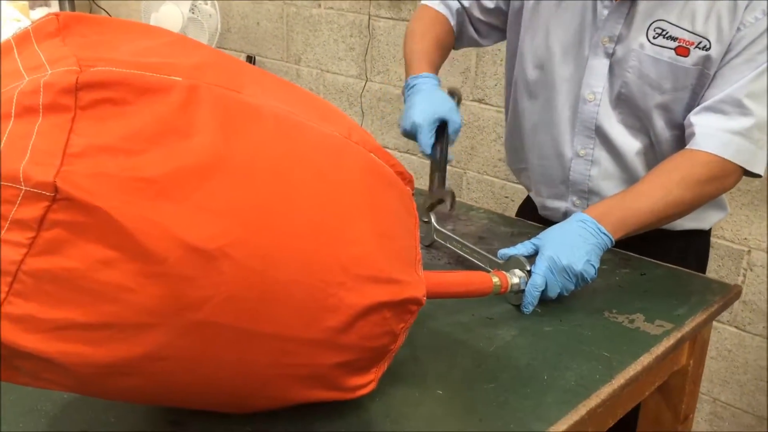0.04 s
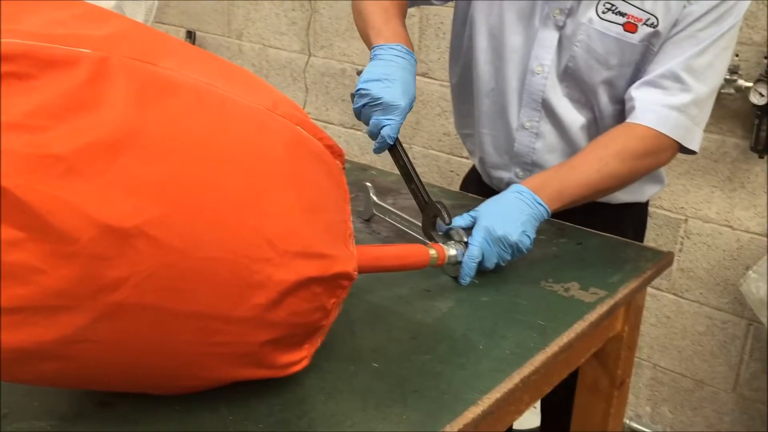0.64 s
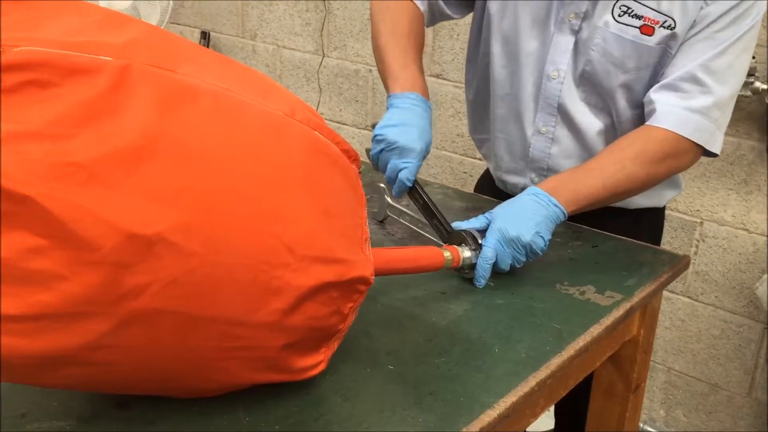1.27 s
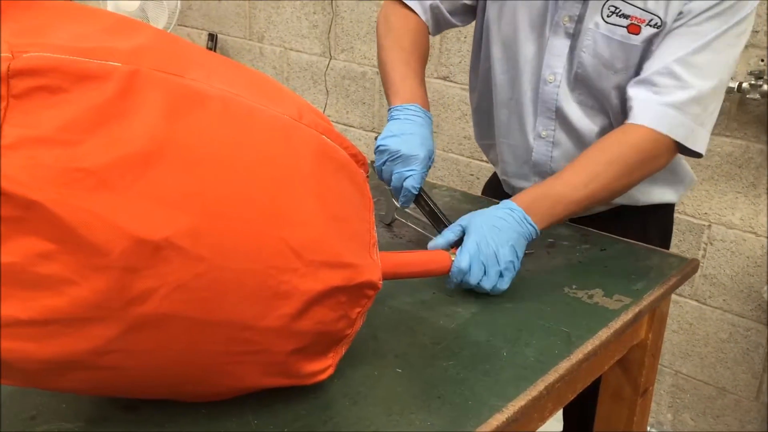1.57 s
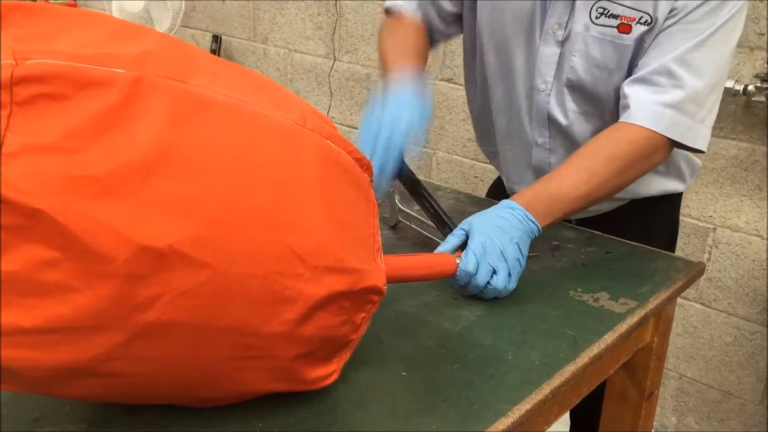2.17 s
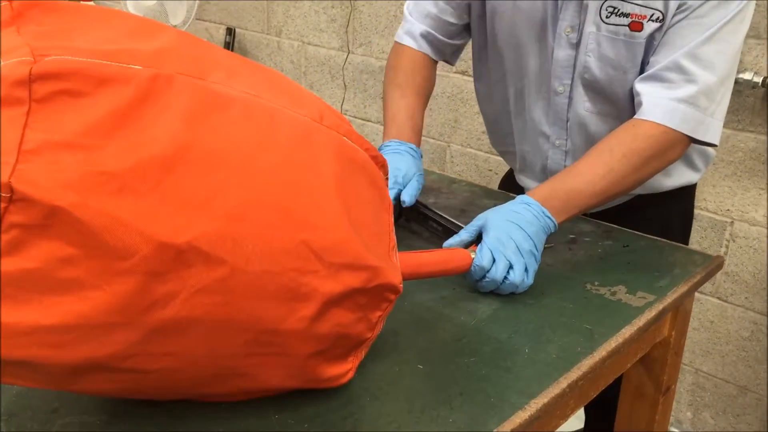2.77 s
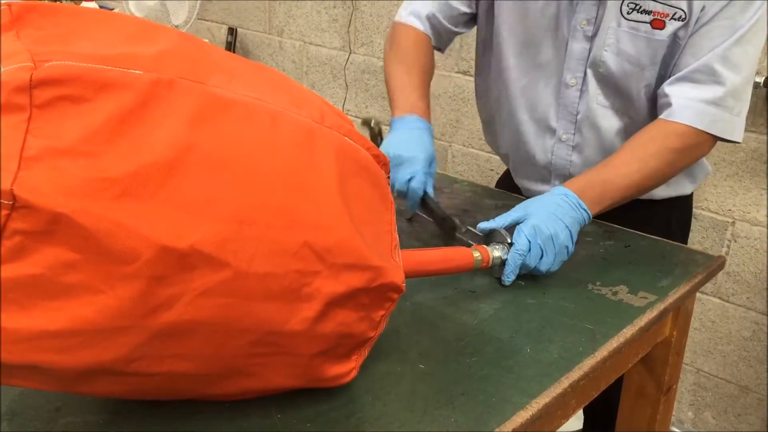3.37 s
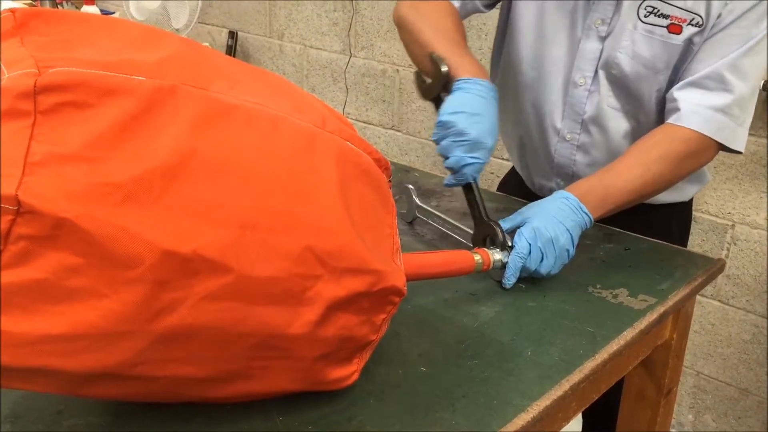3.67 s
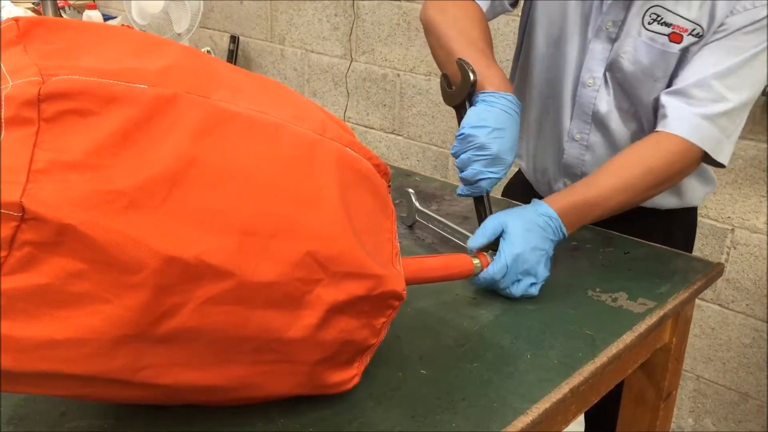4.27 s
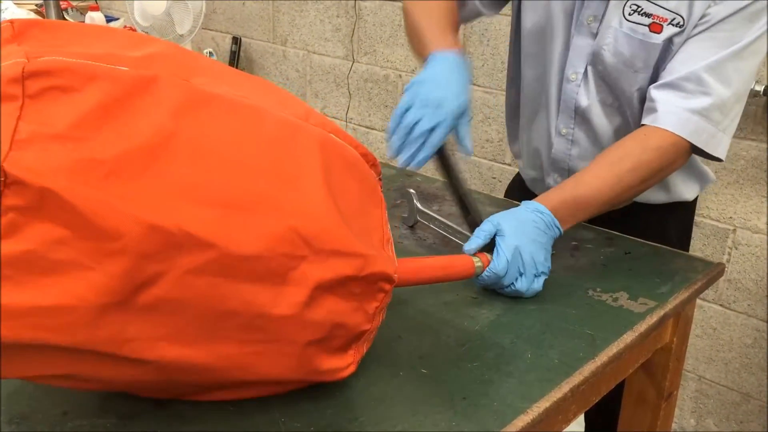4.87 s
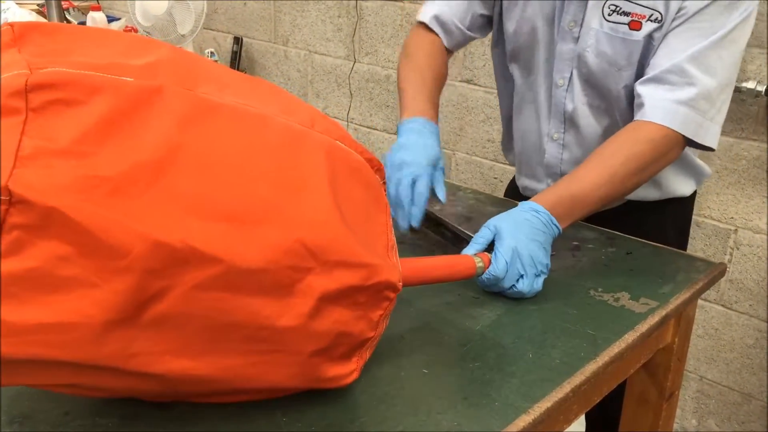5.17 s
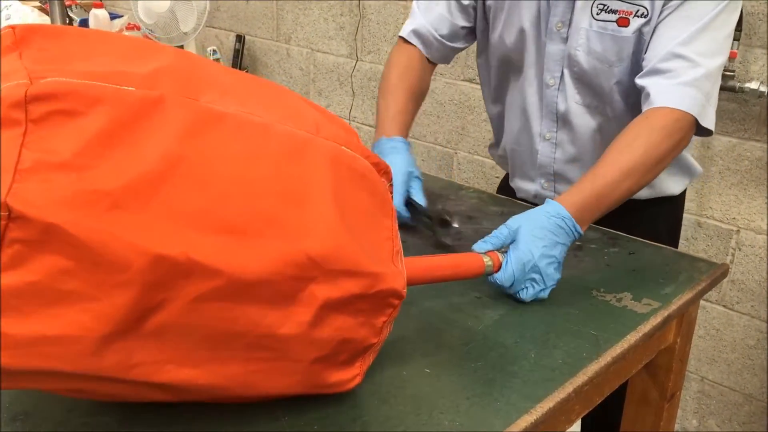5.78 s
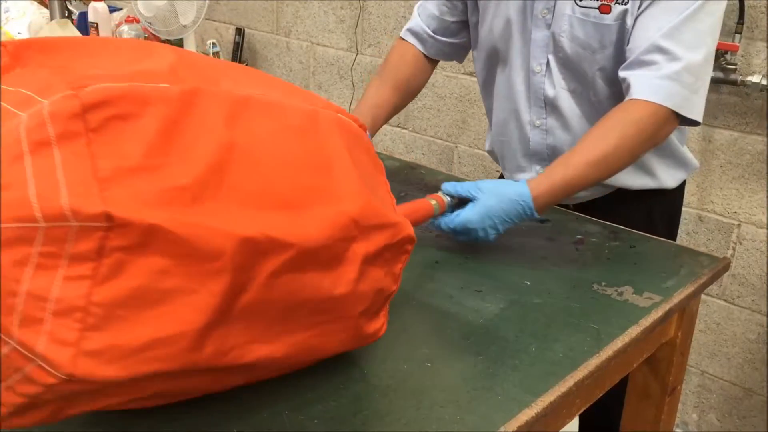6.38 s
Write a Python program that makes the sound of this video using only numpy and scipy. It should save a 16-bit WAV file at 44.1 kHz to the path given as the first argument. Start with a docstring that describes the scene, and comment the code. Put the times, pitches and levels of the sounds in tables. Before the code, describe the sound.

A steel spanner clicks on a fitting and bangs on a bench over a steady, whistling air leak, ending with clinks and rustling fabric.

```python
"""A reverberant workshop. Air leaks from the hose fitting of a large fabric bag on the bench: a thin hiss
with a breathy whistle, brighter when a gloved hand cups it. A long steel spanner clicks on the nut,
knocks and drops on the bench, and rings; the bag rumbles and crinkles as it is dragged across the top.
One microphone, which overloads on the hardest blow."""
import sys
import numpy as np
from scipy import signal
from scipy.fft import rfft, irfft
from scipy.io import wavfile
from scipy.ndimage import map_coordinates

SR = 44100
rng = np.random.default_rng(int(sys.argv[2]) if len(sys.argv) > 2 else 0)


def master(y):
    """Save y as 16-bit WAV."""
    cut = np.clip(np.atleast_2d(y).T, -1, 1)
    pcm = np.round(cut * 32767)  # scale
    wavfile.write(sys.argv[1], SR, pcm.astype(np.int16))


N = 292383
TIME = np.arange(N) / SR
BANDS_HZ = 40 * 2 ** (np.arange(18) / 2)


def undb(db):
    """Decibels to gain."""
    return 10 ** (np.asarray(db) / 20)


def unit(x):
    """Scale to rms 1."""
    return x / np.sqrt(np.mean(x ** 2))


def at_pitch(rows, hz):
    """A spectrum's columns, interpolated over log frequency."""
    row_hz, *columns = np.transpose(rows)
    return [np.interp(np.log(hz), np.log(row_hz), column) for column in columns]


def noise(hz, width_hz, order, count=N):
    """Band-passed white noise."""
    edges_hz = np.clip([hz - width_hz / 2, hz + width_hz / 2], 10, .49 * SR)
    bandpass = signal.butter(order, edges_hz, "band", fs=SR, output="sos")
    return signal.sosfilt(bandpass, rng.standard_normal(count))


def half_octave(hz, count=N):
    """Half an octave of noise, rms 1."""
    return unit(noise(hz, hz * np.log(2) / 2, order=3, count=count))


def walk(rate_hz, count=N):
    """Smooth random curve, spread near 1."""
    knots = rng.standard_normal(1024)
    return np.interp(TIME[:count] * rate_hz, np.arange(len(knots)), knots)


def ramp(start_s, length_s):
    """Linear rise from 0 to 1."""
    return np.clip((TIME - start_s) / max(length_s, 1 / SR), 0, 1)


def fade(t60, count=SR):
    """Exponential decay, 60 dB in t60 seconds."""
    return np.exp(-np.log(1000) * TIME[:count] / max(t60, 1 / SR))


def ring(hz, t60):
    """One decaying mode, slightly detuned at random, in a 1 s buffer."""
    out = np.zeros(SR)
    count = int(np.clip(t60 * SR, 1, SR))
    detuned_hz = hz + 1.5 * rng.standard_normal()
    out[:count] = np.sin(2 * np.pi * detuned_hz * TIME[:count]) * fade(t60, count)
    return out


def add(track, start_s, sound):
    """Mix a sound into a track."""
    i = int(np.clip(start_s * SR, 0, N - 1))
    track[i:i + len(sound)] += sound[:N - i]


# hand over the fitting: close t/s, closing time/s, open t/s, opening time/s
HAND_CUPS = [(1.52, 0.11, 3, 0.19), (4.08, 0.37, 4.5, 1.9)]
# gap resonances: f/Hz, width/Hz, open level/dB, cupped level/dB
GAP_MODES = [(3544, 300, -56, -54.5), (3950, 280, -68, -73), (5730, 140, -69.5, -72), (6140, 380, -65, -80),
             (6470, 73, -64, -69.5), (7230, 380, -60, -77), (7280, 190, -67, -63),
             (10790, 550, -65.5, -55.5), (14100, 600, -65, -56.5)]
# jet hiss per half octave: f/Hz, open level/dB, cupped level/dB
JET_SPECTRUM = [(700, -73, -76), (1400, -69.5, -67), (2630, -65.5, -65.5), (4000, -61.5, -60.5),
                (5110, -66.5, -67), (7070, -64, -63.5), (10200, -65.5, -58.5), (14470, -67, -55.5)]


def leak(flow_db=-1, sag_db_per_s=-.25, muffle_db=-2, flutter_db=1.3, wander=0.0035):
    """The jet hisses and excites the gap, fading as pressure falls; cupping favours the top treble."""
    cupped = sum(ramp(close_s, closing_s) * (1 - ramp(open_s, opening_s))
                 for close_s, closing_s, open_s, opening_s in HAND_CUPS)
    whistle = np.zeros(N)
    for hz, width_hz, open_db, cupped_db in GAP_MODES:
        tone = unit(noise(hz, width_hz, order=2) + 0.18 * noise(hz, width_hz, order=1))
        whistle += tone * undb(open_db + cupped * (cupped_db - open_db) + flutter_db * walk(22.43))
    # pitch wanders with jet speed
    read_at = np.arange(N) + np.cumsum(wander * walk(2.1))
    whistle = map_coordinates(whistle, [read_at], order=3, mode="mirror")
    hiss = np.zeros(N)
    for hz in BANDS_HZ[BANDS_HZ > 600]:
        open_db, cupped_db = at_pitch(JET_SPECTRUM, hz)
        hiss += half_octave(hz) * undb(open_db + cupped * (cupped_db - open_db) + .7 * walk(29))
    return (whistle + hiss) * undb(flow_db + sag_db_per_s * TIME + muffle_db * cupped)


def near_walls(x, share=0.36, reach_s=.012, copies=12):
    """Bench top and back wall return early copies that ripple the spectrum."""
    taps = np.zeros(SR // 20)
    lags = (rng.uniform(0.0011, reach_s, size=copies) * SR).astype(int)
    taps[lags] = share * rng.choice([-1, 1], size=copies) / np.sqrt(copies)
    taps[0] = 1
    return signal.fftconvolve(x, taps / np.sqrt(np.sum(taps ** 2)))[:N]


# background per half octave: f/Hz, level/dB
AIR_SPECTRUM = [(28, -72), (56, -61), (110, -67.5), (170, -60.5), (300, -100), (600, -77.5), (1200, -88),
                (3000, -86.5)]


def workshop_air():
    """Low, gently stirring background noise."""
    return sum(half_octave(hz) * undb(at_pitch(AIR_SPECTRUM, hz)[0] + 1.1 * walk(24))
               for hz in BANDS_HZ[BANDS_HZ < 3000])


# bag and hose shoved over the bench: t/s, length/s, rumble level/dB, crinkle level/dB
BAG_SHOVES = [(0, .42, -68.5, -62), (1.032, 0.12, -49.5, -70), (1.196, 0.064, -34.5, -49),
              (1.435, .06, -41, -68), (3.32, 0.072, -42.5, -47.5), (3.791, 0.097, -36, -51.5),
              (3.955, 0.16, -39, -74), (4.495, 0.43, -72.5, -67), (5.02, 0.12, -42.5, -63),
              (5.248, 0.39, -56, -45), (5.668, 0.22, -37, -49), (5.917, 0.086, -34.5, -43),
              (6.011, 0.15, -35.5, -39), (6.219, 0.088, -32, -25.5), (6.411, 0.077, -44, -38.5)]


def shoving(attack_s=0.035, release_s=0.041, floor_rumble_db=-65.5, floor_crinkle_db=-73):
    """Gains: each shove speeds up, slides, dies away to a faint, steady background rumble and crackle."""
    rumble, crinkle = np.full(N, undb(floor_rumble_db)), np.full(N, undb(floor_crinkle_db))
    for start_s, length_s, rumble_db, crinkle_db in BAG_SHOVES:
        release = np.exp(-np.maximum(TIME - start_s - length_s, 0) / release_s)
        speed = ramp(start_s, attack_s) * release
        rumble += undb(rumble_db) * speed
        crinkle += undb(crinkle_db) * speed
    return rumble, crinkle


# cloth spectra per half octave: f/Hz, relative level/dB
RUMBLE_SPECTRUM = [(40, -76), (90, -9), (160, 8.5), (290, 4), (450, -5), (900, -6), (2000, -66)]
CRINKLE_SPECTRUM = [(300, -15.5), (700, -1), (1400, 2.5), (2500, 0), (4500, -9.5), (9000, -20),
                    (15000, -18.5)]


def bag(snaps_per_s=7000, grain_db=4, catch_db=-0.5):
    """The taut fabric rumbles as it catches and slips; its folds crinkle in tiny snaps."""
    rumble_gain, crinkle_gain = shoving()
    snaps = (rng.random(N) < snaps_per_s / SR) * rng.standard_normal(N)
    snaps *= undb(grain_db * np.minimum(rng.exponential(size=N), 4))
    bins_hz = np.maximum(np.fft.rfftfreq(N, 1 / SR), 1)
    colour = undb(at_pitch(CRINKLE_SPECTRUM, bins_hz)[0]) / np.sqrt(np.maximum(bins_hz, 300))
    crinkle = unit(irfft(rfft(snaps) * colour, N))
    rumble = unit(sum(half_octave(hz) * undb(at_pitch(RUMBLE_SPECTRUM, hz)[0])
                      for hz in BANDS_HZ[BANDS_HZ < 2000]))
    return (rumble * rumble_gain + crinkle * crinkle_gain) * undb(catch_db * walk(38))


# dense ringing of the bench top: f/Hz, level/dB, t60/s
TOP_RINGING = [(40, -10.5, 0.12), (80.4, -3, 0.45), (161.4, -1.5, 0.15), (290, -4.5, 0.19),
               (640, -0.5, 0.079), (1360, 1.5, 0.12), (2600, 2.5, 0.083), (4000, -2.5, 0.1),
               (7900, -7, 0.1), (14900, -11, .05)]
# its clearest modes: f/Hz, level/dB, t60/s
TOP_MODES = [(59.8, 3.5, 0.26), (122, 6.5, 0.16), (152.2, 3.5, 0.12), (196.4, -6.5, 0.2),
             (276.6, -5.5, 0.23), (336.5, -2, 0.091), (437, -6.5, 0.12), (589.5, -3, 0.068),
             (881.4, -2.5, 0.066), (1014, -7, 0.11), (1485, -6, 0.016), (2206, 2.5, 0.034)]
# blows: t/s, level/dB, relative bass/dB, relative crack/dB, relative tick/dB
BENCH_BLOWS = [(0.961,-31,-22,-5,-9), (0.987,-21,-12,-30,-14), (1.002,-20,-4.5,-15.5,-20),
               (1.196,-35.5,4,-16,-26), (1.228,-26.5,-17,-4,-29), (1.284,-17,-13.5,-3.5,-7.5),
               (1.449,-30.5,-1,-16,-20), (1.479,-46,15,-27,-26), (2.038,-54,29,-32,-26),
               (2.308,-6.5,-3.5,-21.5,-18.5), (2.325,-26,-21,11.5,-1), (2.368,-37,-18,15.5,-2),
               (2.749,-6.5,-12,-14,-22), (2.798,-2,-30,-5,-20), (3.330,-35.5,-23.5,-15,-32),
               (3.374,-26.5,-15,-16,-38), (3.433,-16,-17,-15.5,-30), (3.739,-22.5,-12,-3.5,-4),
               (3.803,-19.5,-7,-7.5,-10), (3.828,-25.5,-10,-20,-26), (3.938,-30,-29,-19,-26),
               (4.024,-17.5,-10.5,-14.5,-30), (4.132,-41,13.5,-38,-24), (4.739,-29,8.5,-10.5,-33),
               (4.997,-25,-11,-16,-27), (5.115,-35.5,-14,2,-15), (5.136,3.5,-25,-0.5,-12.5),
               (5.202,-12,-27,-8,-44), (5.759,-17,-43,-11,-33), (6.128,-17,-19,14.5,-16),
               (6.138,-17,-6,6.5,-4), (6.207,-10.5,-15,11,-15), (6.220,-14,-10,-33,-18),
               (6.259,-15,-14,3.5,-12)]


def bench(dense_db=-14.5, modes_db=-8, travel_s=.0013, rise_s=0.0012, front_db=4, front_share=0.17):
    """Each blow sends bending waves through the top: treble arrives first, bass later and stays longer."""
    out = np.zeros(N)
    carriers = [half_octave(hz) for hz in BANDS_HZ]
    count = SR // 3
    for start_s, blow_db, bass_db, crack_db, tick_db in BENCH_BLOWS:
        colour = [(75, bass_db), (190, 0), (750, 0.017), (1900, crack_db), (6000, tick_db)]
        for hz, carrier in zip(BANDS_HZ, carriers):
            band_db, t60 = at_pitch(TOP_RINGING, hz)
            slowness = np.sqrt(500 / hz)  # scales travel and rise; 1 at 500 Hz
            # strong, brief wavefront, then returns from the edges
            decay = undb(front_db) * fade(t60 * front_share, count) + fade(t60, count)
            envelope = decay * (1 - np.exp(-TIME[:count] / (rise_s * slowness)))
            offset = rng.integers(N - count)
            wave = carrier[offset:offset + count] * envelope
            wave *= np.sqrt(np.sum(envelope ** 2) / np.sum(wave ** 2))
            gain = undb(blow_db + dense_db + band_db + at_pitch(colour, hz)[0])
            add(out, start_s + travel_s * slowness, gain * wave)
        for hz, mode_db, t60 in TOP_MODES:
            gain = undb(blow_db + modes_db + mode_db + at_pitch(colour, hz)[0]) * rng.choice([-1, 1])
            add(out, start_s + travel_s * np.sqrt(500 / hz), gain * ring(hz, t60))
    return out


def strike(modes, place, sustain, free_db, contact_db, contact_t60, pull_hz=30, waver_db=4):
    """Steel modes of one blow, weighted by the place of contact (0 jaw, 1 shank)."""
    out = np.zeros(SR)
    for hz, t60, jaw_db, shank_db in modes:
        # chatter at the contact pulls the mode off pitch and damps it
        contact = sum(ring(hz + pull_hz * pull, contact_t60 * np.sqrt(sustain))
                      for pull in rng.standard_normal(3)) / np.sqrt(3)
        # the free ring wavers as the spanner rocks
        free = ring(hz, t60 * sustain) * undb(waver_db * walk(35, count=SR))
        gain = undb(jaw_db + place * (shank_db - jaw_db))
        out += gain * (undb(contact_db) * contact + undb(free_db) * free)
    return out


def tick(hz, width_hz, t60):
    """Brief crack of steel on steel."""
    count = SR // 4
    return unit(noise(hz, width_hz, order=1, count=count)) * fade(t60, count)


# gripped spanner modes: f/Hz, t60/s, jaw-struck level/dB, shank-struck level/dB
GRIPPED_MODES = [(2530,0.28,6,-13), (2840,0.21,-62.5,-22), (3340,0.16,-1.5,2.5), (3640,0.42,-15,-10),
                 (3650,0.059,-15,7.5), (6210,0.51,-27,6), (6400,0.11,-32,-12), (6630,0.24,-19,-16.5),
                 (8110,0.24,-19,-13.5), (8200,0.25,-12,-27), (8610,0.35,-16,-20.5)]
# jaws on the nut: t/s, ring level/dB, place/0-1, t60 factor, tick level/dB
NUT_CLICKS = [(0.961,-51,0.52,2.4,-65), (0.99,-41.5,0,0.58,-54), (1.003,-41,0.16,0.16,-55),
              (1.232,-56,0.77,0.6,-58), (1.285,-37.5,0,0.68,-47), (1.447,-52,0.23,0.47,-51),
              (2.302,-49,0.97,0.18,-35.5), (2.366,-49,0.55,.2,-38), (2.744,-46,0.77,.15,-33.5),
              (3.331,-58,0,0.62,-58), (3.375,-45,0.3,1.24,-56), (3.739,-34,0.54,0.53,-45),
              (3.807,-36,0.74,0.65,-56), (4.731,-69,.6,.2,-33.5), (4.995,-63,0.67,.2,-33.5),
              (5.217,-45,0.69,.3,-32.5)]


def gripped_spanner():
    """The jaws click on the nut; the grip damps the ring."""
    out = np.zeros(N)
    for start_s, ring_db, place, sustain, tick_db in NUT_CLICKS:
        steel = strike(GRIPPED_MODES, place, sustain, free_db=-1.5, contact_db=-2.5, contact_t60=0.057)
        add(out, start_s, undb(ring_db) * steel)
        add(out, start_s, undb(tick_db) * tick(hz=6800, width_hz=18000, t60=0.045))
    return out


# free spanner modes: f/Hz, t60/s, jaw-struck level/dB, shank-struck level/dB
LOOSE_MODES = [(1276,0.55,-11.5,-3), (2015,0.35,-6.5,-19), (2299,0.24,-40,-9), (2340,1,-17.5,-14),
               (3250,0.24,-30,-10), (3630,0.2,1,-14.5), (4320,1.0,-7.5,-11.5), (5090,0.94,-6,-23),
               (5250,0.9,-21,-10), (5810,0.83,-12,-2.5), (5857,0.86,-9,-18), (6100,0.72,-13,-10),
               (6760,0.65,-1.5,-15), (7010,0.31,-30,9), (8220,0.72,-13,-11), (8320,1,-17,-7.5),
               (9220,0.85,-33,-8), (9370,0.48,-10,-8), (10700,0.87,-33,-8), (10600,0.33,-30,-25),
               (11780,0.43,-22,-11), (11740,0.27,-12,-21), (13100,0.21,-3,-28), (14620,.25,-30,-24),
               (15683,.35,-32,-24)]
# clinks on the fitting: t/s, ring level/dB, place/0-1, t60 factor, tick level/dB
LOOSE_CLINKS = [(5.562,-51,0.26,0.38,-62), (5.67,-44.5,0.069,0.44,-57), (5.681,-31.5,0,.4,-29),
                (5.69,-28,0.25,0.77,-32), (5.785,-46,0.34,1,-49), (5.865,-38.5,0.71,0.7,-38),
                (6.045,-46,0.52,0.96,-51), (6.128,-31,0.89,0.12,-26), (6.143,-21,0.7,1,-37),
                (6.208,-25,0.43,0.81,-26)]


def loose_spanner():
    """Lying loose against the fitting, the steel rings long and bright."""
    out = np.zeros(N)
    for start_s, ring_db, place, sustain, tick_db in LOOSE_CLINKS:
        steel = strike(LOOSE_MODES, place, sustain, free_db=-2, contact_db=-2, contact_t60=0.52)
        add(out, start_s, undb(ring_db) * steel)
        add(out, start_s, undb(tick_db) * tick(hz=5400, width_hz=5300, t60=0.2))
    return out


# room reverberation: f/Hz, level/dB, t60/s
ROOM_DECAY = [(50, -28, 0.42), (151, -12, 0.55), (405, -14.5, 1.1), (1000, -12, 1.32), (2020, -14, 1.34),
              (4000, -13, 0.47), (8000, -6.5, 0.25), (15460, -8, 0.29)]


def workshop_echo(x, build_s=0.011):
    """Diffuse echo that builds up and lingers in the midrange."""
    count = 2 * SR
    build_up = 1 - np.exp(-(TIME[:count] / build_s) ** 2)
    response = np.zeros(count)
    for hz in BANDS_HZ:
        db, t60 = at_pitch(ROOM_DECAY, hz)
        tail = half_octave(hz, count) * fade(t60, count) * build_up
        band_share = hz * np.log(2) / SR
        response += undb(db) * tail * np.sqrt(band_share / np.sum(tail ** 2))
    return signal.fftconvolve(x, response)[:N]


def scene(steel_echo_db=-4):
    """Bench, bag and spanner over the steady leak; the steel stirs the room less than bench and bag."""
    bench_and_bag = bench() + bag()
    steel = gripped_spanner() + loose_spanner()
    echo = workshop_echo(bench_and_bag + undb(steel_echo_db) * steel)
    return (bench_and_bag + steel + echo + near_walls(leak()) + workshop_air())[None]


def record(dry):
    """Microphone: 33 Hz high-pass, clipping at full scale, steep 15750 Hz low-pass."""
    highpass = signal.butter(3, 33, "high", fs=SR, output="sos")
    lowpass = signal.ellip(8, .2, 70, 15750, fs=SR, output="sos")
    clipped = np.clip(signal.sosfilt(highpass, dry), -1, 1)
    return signal.sosfilt(lowpass, clipped)


dry = scene()
out = record(dry)
master(out)
```